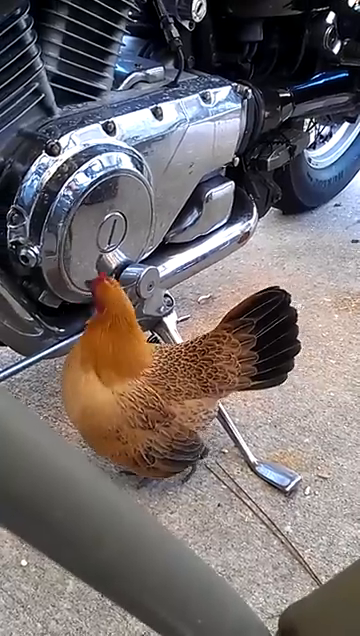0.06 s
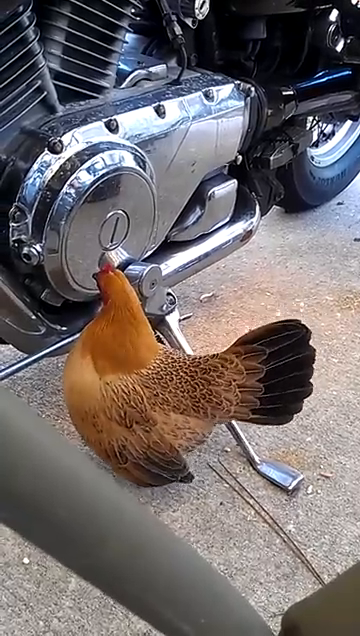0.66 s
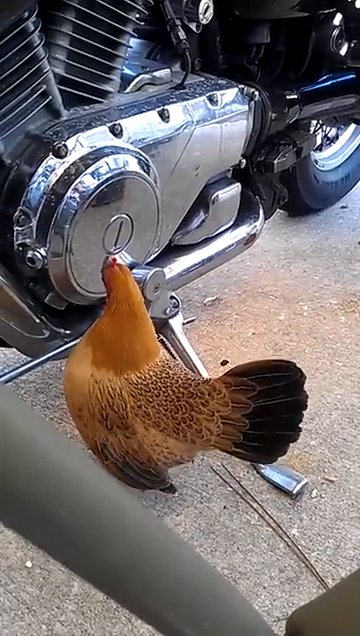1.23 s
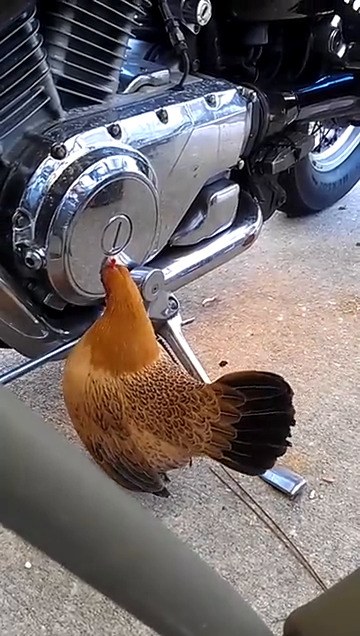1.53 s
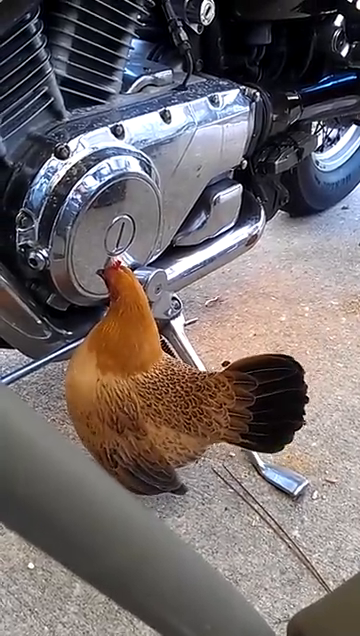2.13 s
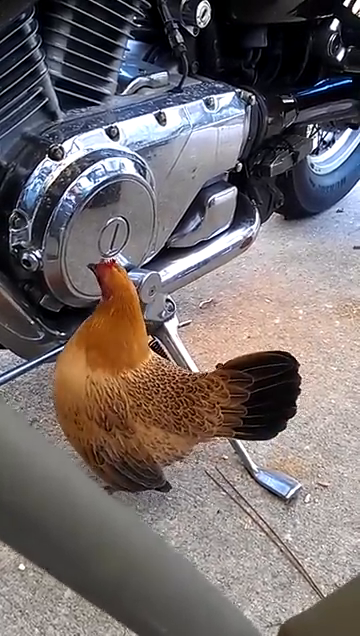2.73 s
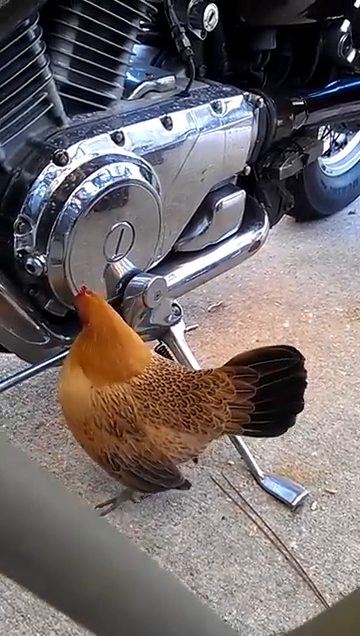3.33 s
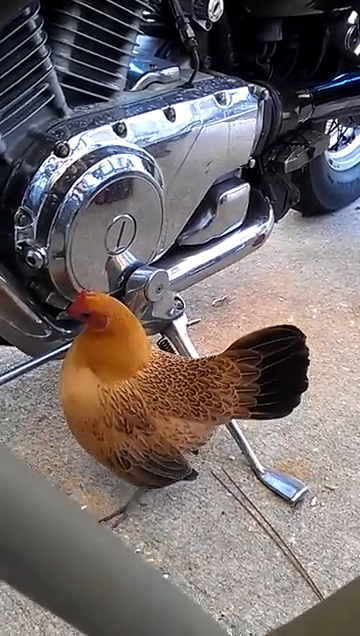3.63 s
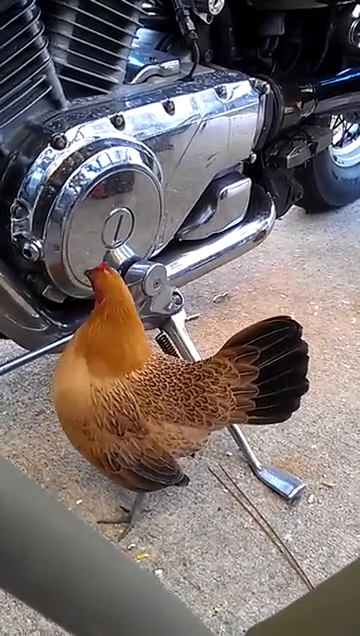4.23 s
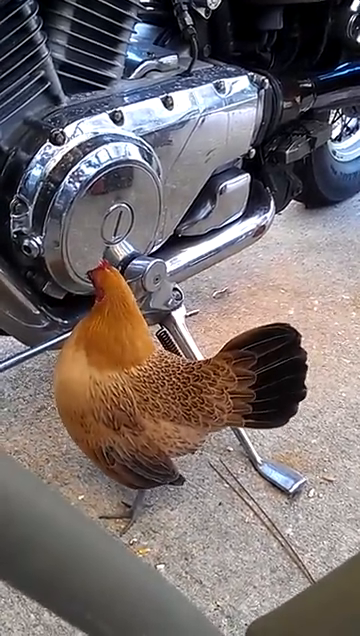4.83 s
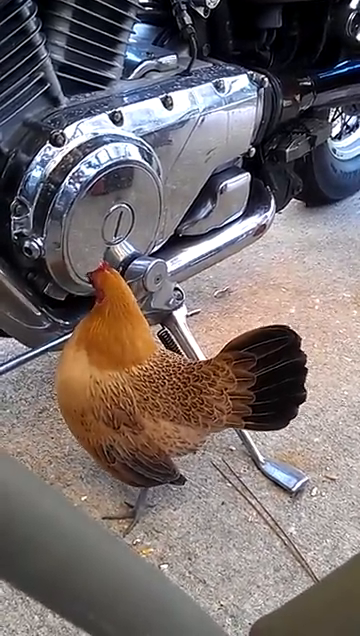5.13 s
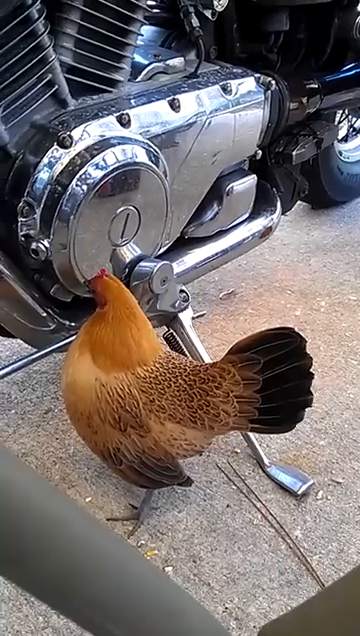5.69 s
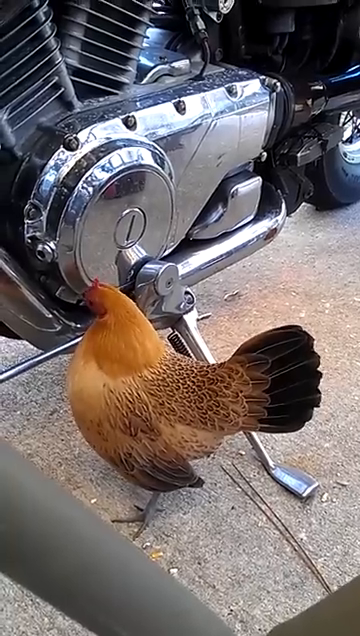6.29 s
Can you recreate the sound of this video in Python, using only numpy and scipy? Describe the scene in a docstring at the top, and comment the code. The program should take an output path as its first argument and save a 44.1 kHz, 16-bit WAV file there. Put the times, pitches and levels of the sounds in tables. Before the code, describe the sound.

A few bright, briefly ringing beak taps on metal open the scene, mixed with claws and feathers scraping on concrete. After a quieter stretch of light scuffs and dull thuds, a hen's whine climbs and roughens into a loud screech, with a couple more pecks inside it, and ends in a fast run of hoarse clucks. It is heard from nearby in an open yard with a soft, steady hiss.

```python
"""A hen's thin rising whine tears into a harsh screech and breaks up into five rasping clucks.
Membranes in her voice box swing ever more unevenly, and her throat and opening beak shape the tone.
Before that she scuffs her feet on concrete and pecks at a parked motorcycle's engine cover, which
rings briefly; a few more pecks and scuffs fall in the call. Soft bumps and faint outdoor hiss lie
underneath, and the camera widens the sound with a short delay."""
import sys
import numpy as np
from scipy import signal
from scipy.fft import rfft, irfft, next_fast_len
from scipy.io import wavfile
from scipy.ndimage import uniform_filter1d, minimum_filter1d, map_coordinates

SR = 44100
rng = np.random.default_rng(int(sys.argv[2]) if len(sys.argv) > 2 else 0)


def output_pcm(signal):
    """Save a mono or channel-first signal as 16-bit PCM at the path in sys.argv[1].

    Samples are clipped to [-1, 1] before scaling.
    """
    pcm = np.clip(np.atleast_2d(signal).T, -1, 1) * 32767
    wavfile.write(sys.argv[1], SR, np.round(pcm).astype(np.int16))


N = 284489
TIME = np.arange(N) / SR


def amp(db):
    """Turn decibels into a gain."""
    return 10 ** (np.asarray(db) / 20)


def unit(x):
    """Scale a signal to an average power of 1."""
    return x / np.sqrt(np.mean(x ** 2) + 1e-20)


def along(points, hz):
    """Read between (freq_hz, value) points, with octaves evenly spaced."""
    freqs, values = np.transpose(points)
    return np.interp(np.log(hz + 1), np.log(freqs + 1), values)


def curve(rows):
    """Join (time_s, value) points with straight lines."""
    return np.interp(TIME, *np.transpose(rows))


def ramp(start_s, end_s):
    """Rise from 0 to 1 between two times."""
    return np.clip((TIME - start_s) / (end_s - start_s), 0, 1)


def bell(peak_s, width_s):
    """A bell-shaped swell."""
    return np.exp(-((TIME - peak_s) / width_s) ** 2)


def stroke(start_s, rise_s, fade_s, held_s=0):
    """Rise, hold and die away. Here and below, fade_s is the time to fall by 60 dB."""
    level = np.zeros(N)
    span = slice(*np.searchsorted(TIME, [start_s, start_s + rise_s + held_s + 2 * fade_s]))
    t = TIME[span] - start_s
    level[span] = np.minimum(t / rise_s, 1) * amp(-60 * np.maximum(t - rise_s - held_s, 0) / fade_s)
    return level


def wobble(rate_hz):
    """A smooth curve through rate_hz random values a second."""
    return unit(map_coordinates(rng.standard_normal(N // 16), [TIME * rate_hz], order=2))


def filtered(x, response):
    """Multiply each frequency f in x by response(f)."""
    size = next_fast_len(N + SR // 2)
    return irfft(rfft(x, size) * response(np.fft.rfftfreq(size, 1 / SR)), size)[..., :N]


def resonances(modes, f):
    """A filter's gain with one steep peak for each row of modes."""
    return np.sqrt(sum(amp(db) ** 2 / (1 + ((f - hz) / width) ** 2) ** 3 for hz, width, db in modes))


def lowpass(f, hz, order=4):
    """A filter's gain that lets through what lies below hz."""
    return 1 / np.sqrt(1 + (f / hz) ** (2 * order))


def noise(colour):
    """Noise shaped by (freq_hz, gain_db) points."""
    return unit(filtered(rng.standard_normal(N), lambda f: amp(along(colour, f))))


# Ringing shared by the background and the scuffs: freq_hz, width_hz, gain_db
RING_PEAKS = [(870, 160, -6.5), (2040, 530, -5), (3813, 200, 0), (4320, 170, 0), (5050, 160, -15.5)]
def ringing_noise():
    """Noise gathered around a few pitches."""
    return unit(filtered(rng.standard_normal(N), lambda f: resonances(RING_PEAKS, f)))


# Tone colour of the outdoor air: freq_hz, gain_db
AIR_COLOUR = [(18, -68), (30, -48), (91, -12.5), (150, -7.5), (296, -3), (331, -5.5), (476, -5.5),
              (571, -5), (858, 0.5), (1150, -8.5), (1770, -5), (2850, -6.5), (4390, -4), (5760, -6.5),
              (6750, -17.5), (8780, -32.5), (14900, -120)]
# How the high hiss swells and sinks: time_s, gain_db
HISS_SWELL = [(0.0, -47), (0.17, -44.5), (0.49, -40.5), (1.24, -39.5), (1.58, -42.5), (1.9, -41.5),
              (2.23, -40.5), (2.69, -44.5), (3.36, -44), (4.2, -47.5)]
# Through the camera, the background loses deep bass and highest hiss as the hen calls: time_s, gain_db
EDGE_DIP = [(4.55, 0), (4.72, -11), (5.1, -14), (5.6, -16.5), (5.75, -4), (6.45, -2.5)]
# The whole background lifts a little in the screech, then sinks: time_s, gain_db
BACKGROUND_SWELL = [(4.6, 1), (5.1, 3.5), (5.55, 1), (5.72, 2.5), (6.45, -3)]
def background(hiss_db=-3.5, wash_db=-50):
    """Faint outdoor hiss over a low wash, both gently wavering, as the camera hears them."""
    air = noise(AIR_COLOUR) + amp(-11) * ringing_noise()
    low = filtered(air, lambda f: lowpass(f, 2000))
    hiss = amp(curve(HISS_SWELL) + hiss_db + 1.2 * wobble(20)) * unit(air - low)
    wash = amp(wash_db + 1.6 * wobble(9.3)) * unit(low)
    middle = filtered(hiss + wash, lambda f: lowpass(f, 6900, order=16) * (1 - lowpass(f, 240)))
    edges = hiss + wash - middle
    return (middle + amp(curve(EDGE_DIP)) * edges) * amp(curve(BACKGROUND_SWELL))


def yard_echo(x, fade_s=0.13):
    """A short answer from the motorcycle and the ground, different in each ear."""
    t = TIME[:SR // 3]
    tail = rng.standard_normal((2, len(t))) * amp(-60 * t / fade_s) * (t > .003)
    return signal.fftconvolve(x[None], tail / np.linalg.norm(tail[0]), axes=1)[:, :N]


# Soft low bumps: start_s, level_db, fade_s
BUMP_HITS = [(2.839, -47.5, 0.23), (2.93, -50, .11), (3.325, -48.5, 0.086), (3.5, -41, 0.075),
             (3.875, -35, 0.055), (4.038, -48, 0.09), (4.156, -39.5, 0.046), (4.305, -40.5, 0.11),
             (4.553, -48.5, .08)]
# Their tone colour: freq_hz, gain_db
BUMP_COLOUR = [(55, -35), (90, -6.5), (150, -3.5), (260, -7.5), (450, -19), (1500, -64.5)]
def bumps(rise_s=0.011):
    """Dull thuds that die at once."""
    level = sum(amp(db) * stroke(start_s, rise_s, fade_s) for start_s, db, fade_s in BUMP_HITS)
    return level * noise(BUMP_COLOUR)


# Notes the engine cover rings with: pitch_hz, gain_db, fade_s
COVER_NOTES = [(825, -2, 0.058), (2180, -5.5, 0.061), (2640, -8.5, 0.12), (3905, -10, 0.11),
               (4040, -5, 0.044), (4423, -10.5, 0.14), (4870, -15.5, 0.087), (5720, -14.5, 0.038),
               (5960, -15, 0.04)]
# Pecks and their skids: start_s, strike_db, skid_db, skid_fade_s, skid_bass_db, favoured_hz
PECK_HITS = [(.412, -16, -18.5, .16, 0.5, 5950), (.415, -24, -40, .05, 0, 830),
             (0.4217, -18, -25.5, 0.2, -3, 4000), (.7445, -21.5, -19.5, .18, -2, 2200),
             (.7535, -24, -32, .1, -1, 2650), (1.187, -38, -40, .08, -6, 4400),
             (1.336, -39, -51, .08, -6, 4400), (2.125, -50, -34, 0.15, 2, 830),
             (3.501, -36, -35, .14, 7, 2100), (3.553, -36, -52, .1, -6, 3900),
             (4.7658, -25.5, -22.5, .035, -16, 5375), (4.7714, -35, -27.5, 0.091, -16, 4996),
             (4.896, -26, -21.5, 0.066, -19, 2398), (4.91, -37, -28, .06, -16, 5000)]
def pecks(tick_db=-2, tick_fade_s=0.0038, rise_s=0.00089, favour_db=7.5, favour_octaves=0.26):
    """The beak ticks on the cover, which rings; each spot brings out notes near its favoured pitch."""
    out, t = np.zeros(N), TIME[:SR // 5]
    for start_s, strike_db, *_, favoured_hz in PECK_HITS:
        ring = np.zeros(len(t))
        for hz, db, fade_s in COVER_NOTES:
            boost_db = favour_db * np.exp(-(np.log2(hz / favoured_hz) / favour_octaves) ** 2)
            note_db = db + boost_db + rng.normal(0, 0.84)
            ring += amp(note_db - 60 * t / fade_s) * np.sin(2 * np.pi * hz * t)
        tick = amp(tick_db - 60 * t / tick_fade_s) * rng.standard_normal(len(t))
        out[round(start_s * SR):][:len(t)] += amp(strike_db) * (ring + tick) * np.minimum(t / rise_s, 1)
    return filtered(out, lambda f: lowpass(f, 7600) * (1 - lowpass(f, 170)))


# Scuffs of claws and feathers: start_s, level_db, fade_s, bass_db
SCUFF_STROKES = [(0.04, -37, 0.38, 2), (.25, -33.5, 0.43, -13), (0.293, -34.5, 0.49, 4),
                 (0.339, -29.5, 0.16, 6), (0.458, -22.5, 0.15, -4), (0.651, -40.5, 1, 9.5),
                 (.697, -21, 0.24, 0.5), (0.846, -33.5, 0.38, 2.5), (1.06, -35, 0.54, 1.5),
                 (1.175, -33, 0.21, -12), (1.327, -37, 0.37, -23), (2.406, -40, .11, 2),
                 (2.572, -36, 0.2, 5), (3.317, -43, 0.21, 14), (3.539, -34, 0.22, -27),
                 (3.741, -40, 0.3, 4), (4.322, -39, 0.7, 11), (4.403, -30.5, 0.32, 10),
                 (4.534, -37, 0.64, 3)]
# Tone colour of the grit: freq_hz, gain_db
GRIT_COLOUR = [(35, -71), (60, -27.5), (111, -23), (244, -21), (286, -9), (433, -9.5), (527, -9.5),
               (848, -8), (1070, -16), (1500, -9), (2280, -5.5), (3450, -4.5), (3960, -4), (5760, -6),
               (6750, -18), (8780, -34.5), (14900, -120)]
def scuffs(rise_s=.014, skid_lead_s=0.0034, skid_rise_s=0.0048, grain_db=1.8, ring_db=-5):
    """Claws, feathers and the skidding beak drag in short, gritty strokes."""
    drags = []
    for start_s, db, fade_s, bass_db in SCUFF_STROKES:
        drags.append((amp(db) * stroke(start_s, rise_s, fade_s), bass_db))
    for start_s, _, db, fade_s, bass_db, _ in PECK_HITS:  # the beak grazes just before it strikes
        drags.append((amp(db) * stroke(start_s - skid_lead_s, skid_rise_s, fade_s), bass_db))
    for _ in range(10):  # faint scuffs while she fidgets
        start_s, db = rng.uniform(0.54, 2.7), -40.25 - rng.uniform(0, 9)
        drags.append((amp(db) * stroke(start_s, rise_s, fade_s=.15), 0))
    high_level = np.sqrt(sum(level ** 2 for level, _ in drags))
    low_level = np.sqrt(sum((level * amp(bass_db)) ** 2 for level, bass_db in drags))
    grains = rng.standard_normal(N) * amp(grain_db * wobble(1200))
    grit = unit(filtered(grains, lambda f: amp(along(GRIT_COLOUR, f))))
    scrape = unit(grit + amp(ring_db) * ringing_noise())
    low = filtered(scrape, lambda f: lowpass(f, 1500))
    return low_level * low + high_level * (scrape - low)


# The concrete and the engine's side throw the voice back: delay_s, gain_db
BOUNCES = [(.004, -14), (.00462, -9.5)]
def close_echoes(x):
    """Very quick echoes weaken some frequencies and make the voice hollow."""
    return filtered(x, lambda f: 1 + sum(amp(db) * np.exp(-2j * np.pi * f * s) for s, db in BOUNCES))


def beak(x, low_hz=700, high_hz=6600):
    """The small beak sends out no bass, and the soft throat swallows the top."""
    return signal.sosfilt(signal.butter(7, [low_hz, high_hz], "band", fs=SR, output="sos"), x)


def throat(x, modes, lift):
    """The throat rings at several pitches; a tighter neck multiplies them all by lift."""
    f, t, spectrum = signal.stft(x, SR, nperseg=1024)
    gain = resonances(modes, f[:, None] / np.interp(t, TIME, lift))
    return signal.istft(spectrum * gain, nperseg=1024)[1][:N]


def voice_box(pitch_hz, rough, second_db, second_hz=779.4, waver=.018, jitter=.11, shimmer_db=1.2):
    """Membranes swing, less evenly as rough goes from 0 to 1; a lower second side beats against them."""
    scatter = waver * wobble(85) + jitter * rough * wobble(620)
    first_phase = 2 * np.pi * np.cumsum(pitch_hz * (1 + scatter)) / SR
    second_phase = 2 * np.pi * np.cumsum(second_hz * (1 + .025 * wobble(85))) / SR
    tug = 1 + amp(second_db) * np.exp(1j * (second_phase - first_phase))
    swing = np.sqrt(np.abs(tug)) * amp(shimmer_db * rough * wobble(260))
    return first_phase + np.angle(tug), swing


# Windpipe ringing, which stays put: freq_hz, width_hz, gain_db
WINDPIPE_PEAKS = [(500, 89, -9), (802, 40, -4.5), (890, 71, -2.5), (1311, 110, -2), (1460, 330, -9.5)]
def voice(pitch_hz, rough, second_db, open_db, modes, lift, windpipe_db, puff_db=-7, quaver_db=1.2):
    """The swing makes a tone, and each closing slaps the throat and lets through a puff of air."""
    phase, swing = voice_box(pitch_hz, rough, second_db)
    between = amp(-22) * (1 - rough) * np.sin(1.5 * phase)  # alternating swings add this tone
    tone = filtered(swing * (np.sin(phase) + between), lambda f: lowpass(f, 1420, order=9))
    slaps = swing * sum(np.sin(k * phase) for k in range(2, 7))
    puffs = rough * swing * (1 + np.cos(phase)) * rng.standard_normal(N)
    cry = tone + amp(open_db) * throat(slaps + amp(puff_db) * puffs, modes, lift)
    cry += amp(windpipe_db) * filtered(puffs, lambda f: resonances(WINDPIPE_PEAKS, f))
    # steady lung pressure holds the power while the swing tumbles
    cry /= np.sqrt(np.abs(uniform_filter1d(cry ** 2, size=700)) + 1e-9)
    return cry * amp(quaver_db * np.sqrt(rough) * wobble(70))


# The throat, pinched tight for the clucks: freq_hz, width_hz, gain_db
PINCHED_THROAT = [(1837, 144, 5.5), (2060, 140, 9.5), (2422, 125, -5.5), (3160, 304, -9),
                  (3860, 160, -12.5), (4324, 230, -20.5), (4930, 250, -24.5), (5730, 225, -9),
                  (6130, 250, -22)]
# Clucks (a negative dip is a swell): start_s, held_s, level_db, pitch_hz, dip_db
CLUCK_NOTES = [(5.730, 0.068, -19.5, 1160, -1.5), (5.878, 0.11, -20, 1149, -6.5),
               (6.053, 0.075, -19, 1182, -.5), (6.215, 0.085, -19.5, 1173, 10), (6.4, .08, -21, 1137, -2.5)]
def clucks(burst_db=6, burst_s=0.013, rise_s=0.0026, fade_s=0.08, pitch_drop=.14, snap_db=-18):
    """Each cluck snaps open loud, low and bright, dips or swells, holds a rasp and is let go."""
    level, opening, pitch_hz = np.zeros(N), np.zeros(N), np.full(N, 1069.0)
    for start_s, held_s, db, hz, dip_db in CLUCK_NOTES:
        t = np.maximum(TIME - start_s, 0)
        burst = bell(start_s, burst_s) * (t > 0)
        dip = bell(start_s + 0.019, width_s=0.0084)
        fade_db = 60 * np.maximum(t - held_s, 0) / fade_s
        level += np.minimum(t / rise_s, 1) * amp(db + burst_db * burst - dip_db * dip - fade_db)
        opening += burst
        pitch_hz = np.where(t > 0, hz * (1 - pitch_drop * burst), pitch_hz)
    cry = voice(pitch_hz, rough=.9, second_db=-22, open_db=2 * opening, modes=PINCHED_THROAT,
                lift=1 + .012 * wobble(25), windpipe_db=6)
    snap = amp(snap_db) * opening ** 2 * rng.standard_normal(N)
    return level * (cry + snap)


# The call climbs as the hen strains: time_s, pitch_hz
CALL_CLIMB = [(4.23, 775), (4.33, 793), (4.37, 829), (4.43, 845), (4.47, 888), (4.51, 875), (4.6, 906),
              (4.74, 914.4), (4.8, 1020), (4.95, 1040), (5.1, 1072), (5.4, 1096), (5.7, 1127)]
# Pushes of breath, each louder, lower and brighter: time_s, strength
BREATH_PUSHES = [(4.253, 1.9), (4.322, 1.3), (4.44, 0.74), (4.51, 0.74), (4.563, 1.04), (4.606, 1.005),
                 (4.65, 0.67), (4.68, 0.54), (4.711, 0.78)]
# The whine slips, flicking upward, fraying and fading: time_s, strength, width_s
VOICE_SLIPS = [(4.264, 0.7, 0.0066), (4.286, 1.6, 0.0096), (4.343, 1.44, 0.0029), (4.536, 1.043, 0.01106),
               (4.59, 0.804, 0.01103), (4.669, 0.51, 0.0052), (4.743, 0.64, 0.0081)]
# Strength of the voice box's second side next to the first: time_s, gain_db
SECOND_SIDE = [(4.55, -48.5), (4.62, -27), (4.775, -11.5), (4.795, -1.5), (4.825, 0.5), (4.85, -7.5),
               (4.97, -7), (5.06, -17.5), (5.65, -17)]
# The throat at rest: freq_hz, width_hz, gain_db
RESTING_THROAT = [(1860, 186, 6), (2040, 101, 4), (2435, 320, -8.5), (3020, 277, -10), (3820, 400, -20.5),
                  (4270, 270, -23), (5040, 110, -26), (5480, 390, -15.5), (6090, 380, -23.5)]
def long_call(start_s=4.234, end_s=5.645, rise_s=0.0072, level_db=-19.5, throat_rest_hz=1069):
    """The whine climbs, tears and opens into a screech; pushes and slips make it quaver on the way."""
    push = sum(strength * bell(s, width_s=0.01399) for s, strength in BREATH_PUSHES)
    slip = sum(strength * bell(s, width_s) for s, strength, width_s in VOICE_SLIPS)
    pitch_hz = curve(CALL_CLIMB) * (1 - 0.02202 * push + 0.09 * slip)
    rough = np.clip(0.15 + 0.7 * ramp(4.38, 4.98) + 0.13 * slip, 0, 1)
    # the nearly closed beak holds back the overtones until it opens wide
    open_db = -27.5 * (1 - ramp(4.325, 5.057)) + 9 * push * (1 - rough)
    soft_start_db = -10 * (1 - ramp(start_s, start_s + 0.098))
    level = amp(level_db + soft_start_db + 3 * push - 7 * slip)
    breath = stroke(start_s, rise_s, fade_s=0.11, held_s=end_s - start_s - rise_s)
    lift = (pitch_hz / throat_rest_hz) ** 0.39  # the neck tightens as the pitch climbs
    cry = voice(pitch_hz, rough, curve(SECOND_SIDE), open_db, RESTING_THROAT, lift, windpipe_db=5)
    return breath * level * cry


def scene():
    """The hen's voice, pecks, scuffs and bumps in the open yard."""
    hen = close_echoes(beak(long_call() + clucks()))
    near = hen + pecks() + scuffs() + bumps()
    return near + background() + amp(-19.5) * yard_echo(near)


def limiter(x, ceiling=.92):
    """Turn the sound down for a few milliseconds around any peak above the ceiling."""
    gain = np.minimum(1, ceiling / (np.abs(x).max(axis=0) + 1e-9))
    return x * uniform_filter1d(minimum_filter1d(gain, size=300), size=200)


# Strength of the delayed copy: freq_hz, share
COPY_SHARE = [(100, 1), (400, 0.9), (1500, 0.74), (4000, 0.79), (6000, 0.68), (9000, 1)]
# Gain of the left side over the right: freq_hz, gain_db
LEFT_OVER_RIGHT = [(100, -4), (400, 1.5), (900, -1), (3000, -2), (4500, -2.5), (6000, -7.5), (7200, -4),
                   (9000, -14)]
def widening(f, delay_s=.001618):
    """A filter that takes a delayed copy from the left, adds it to the right and tilts the balance."""
    sides = np.array([[1], [-1]])
    copy = np.clip(along(COPY_SHARE, f), 0, 1) * np.exp(-2j * np.pi * f * delay_s)
    return (1 - sides * copy) * amp(sides * along(LEFT_OVER_RIGHT, f) / 2)


def record(dry, low_hz=45, high_hz=10800):
    """The camera widens the sound, holds down peaks and trims the deepest bass and highest treble."""
    wide = limiter(filtered(dry, widening))
    return filtered(wide, lambda f: (1 - lowpass(f, low_hz, order=2)) * lowpass(f, high_hz, order=24))


dry = scene()
out = record(dry)
output_pcm(out)
```